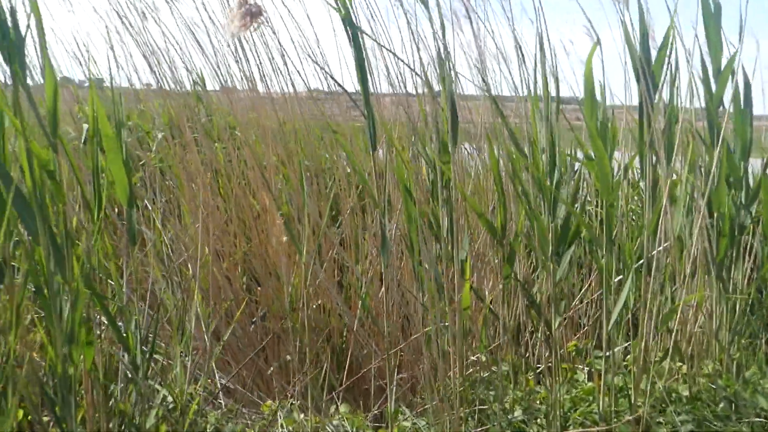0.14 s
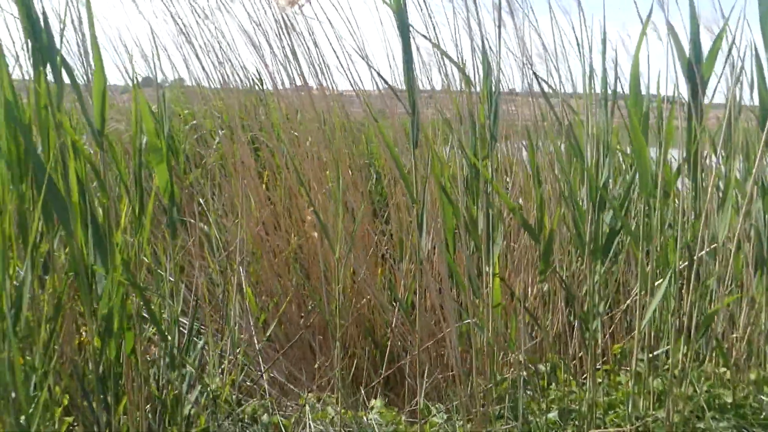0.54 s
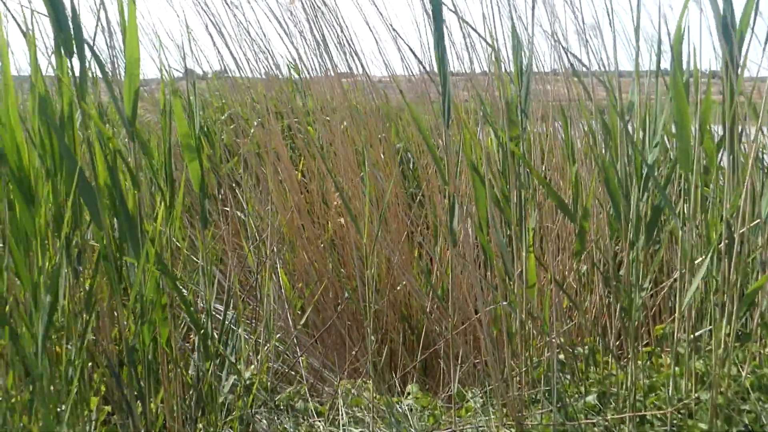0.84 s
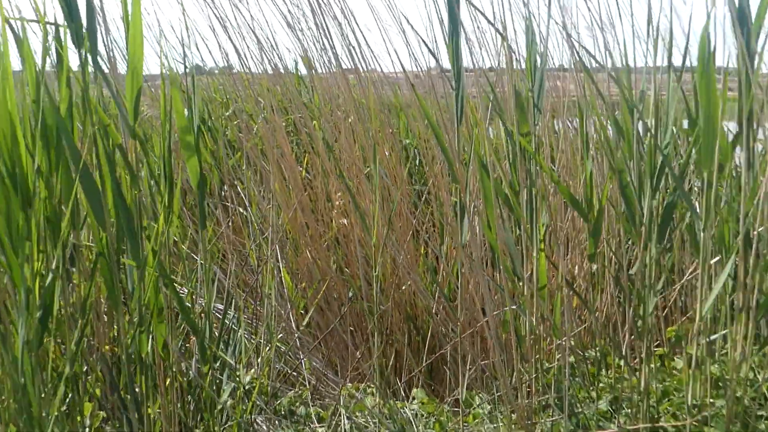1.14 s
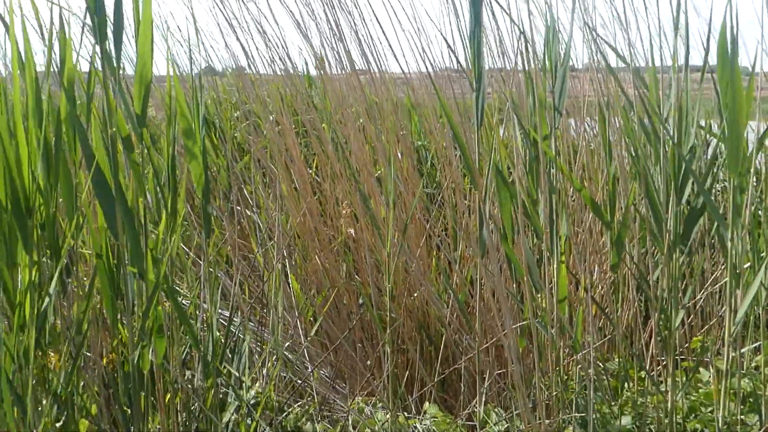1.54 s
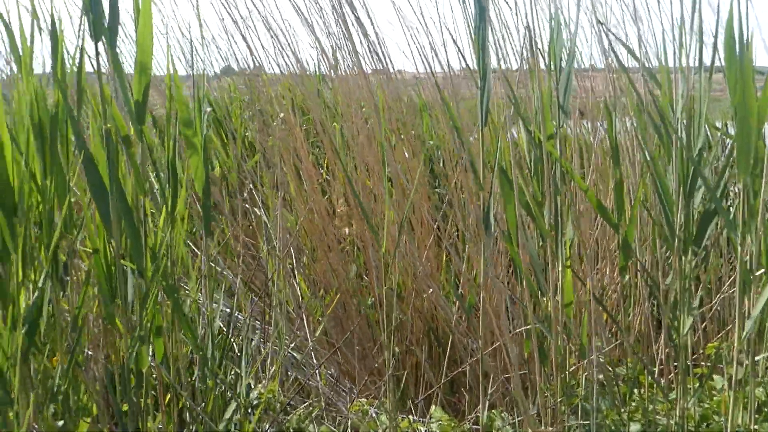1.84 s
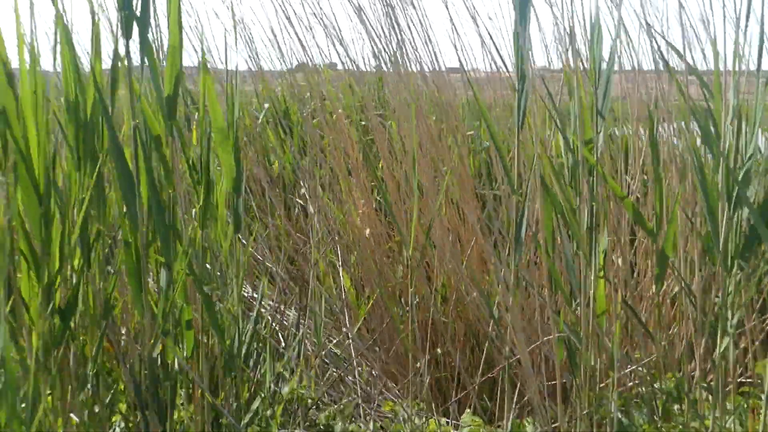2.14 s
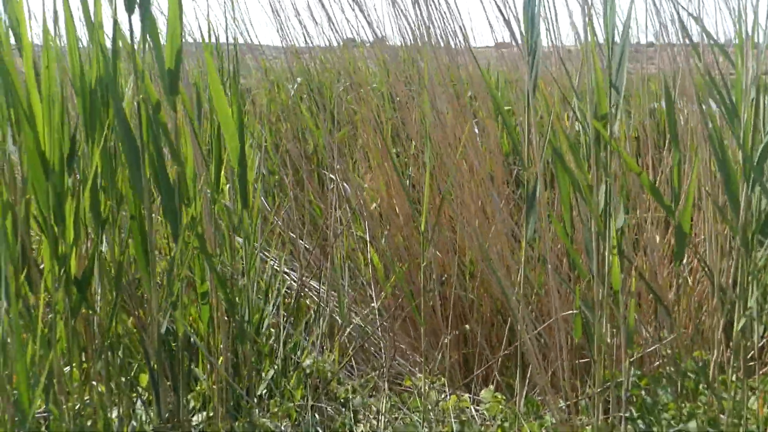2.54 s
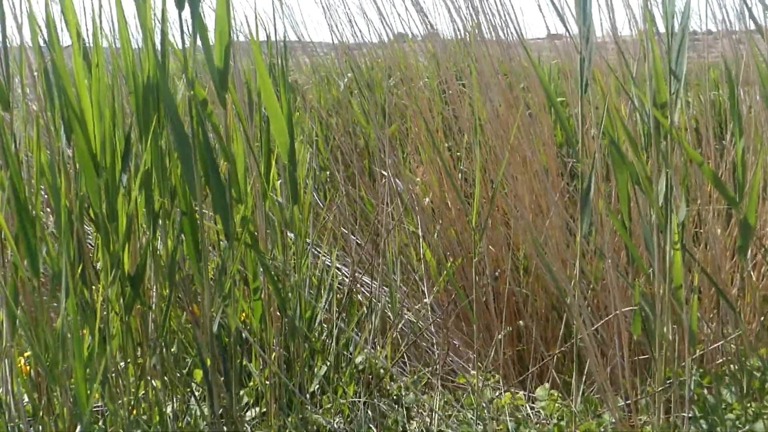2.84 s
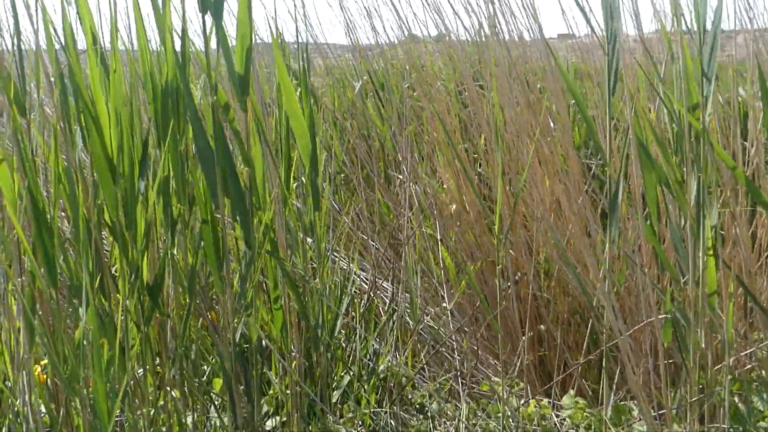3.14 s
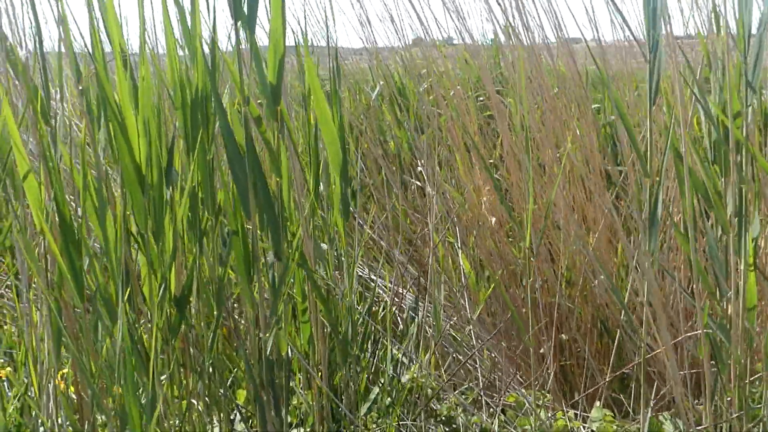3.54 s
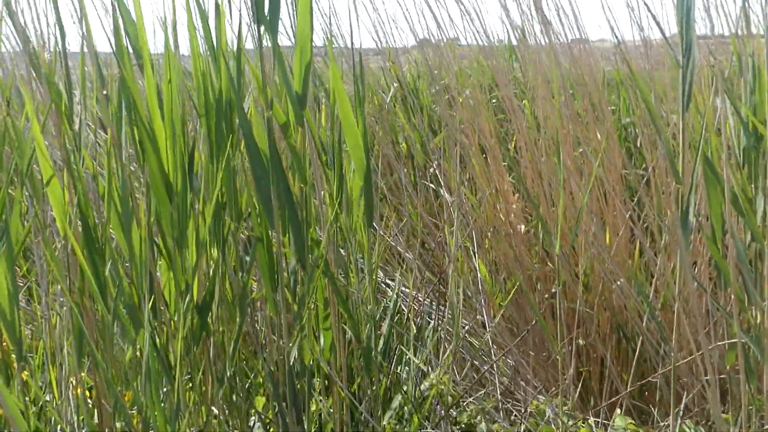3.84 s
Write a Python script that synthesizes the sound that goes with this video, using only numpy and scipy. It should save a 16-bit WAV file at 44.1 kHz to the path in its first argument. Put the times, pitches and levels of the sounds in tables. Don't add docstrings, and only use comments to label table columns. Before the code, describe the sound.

Harsh, chattering warbler song, near and slightly left, dominates the first three seconds, then a farther warbler ticks and squeaks; low wind rumble, leaf hiss, faint dove coos and a few stem clicks, outdoors.

```python
import sys
import numpy as np
from scipy import signal
from scipy.fft import rfft, irfft
from scipy.io import wavfile
from scipy.ndimage import uniform_filter1d

SR = 44100
rng = np.random.default_rng(int(sys.argv[2]) if len(sys.argv) > 2 else 0)


def attenuation_scalar(level_db):
    decades = np.asarray(level_db, float) / 20
    return 10 ** decades


def materialize(psi):
    bounded = np.clip(np.atleast_2d(psi).T, -1, 1)
    quanta = np.round(bounded * 32767).astype(np.int16)
    wavfile.write(sys.argv[1], SR, quanta)


N = 176400


def evened(x):
    return x / np.sqrt(np.mean(x ** 2) + 1e-20)


def read(points, hz):
    f, value = np.transpose(points)
    return np.interp(np.log(hz + 1), np.log(f + 1), value, left=value[0] - 30, right=-99)


def add(mix, s, sound):
    part = mix[..., max(round(s * SR), 0):][..., :sound.shape[-1]]
    part += sound[..., :part.shape[-1]]


def resonate(x, hz, width):
    b, a = signal.iirpeak(min(hz, 20000), hz / width, SR)
    return signal.lfilter(b, a, signal.lfilter(b, a, x))


def coloured(db_of_hz, channels):
    z = rfft(rng.standard_normal((channels, N)))
    return evened(irfft(z * attenuation_scalar(db_of_hz(np.fft.rfftfreq(N, 1 / SR))), N))


def drift(span_s, size):
    n = max(int(span_s * SR), 2)
    return evened(uniform_filter1d(uniform_filter1d(rng.standard_normal(size), n), n))


# frequency in Hz, level in dB per Hz.
AIR = [(400, -17.5), (900, -19.5), (3000, -24), (7000, -30.5), (11500, -29.5), (15900, -34.5)]
# middle in seconds, spread in seconds, level in dB, centre in Hz, width in octaves.
RUSTLES = [
    (1.64, 0.28, -42.5, 2670, 1),
    (2.338, 0.17, -40, 9600, 1),
    (3.97, 0.75, -47.5, 2630, 1),
    (2.87, 0.061, -41, 11300, 0.29),
]


def leaves():
    t = np.arange(N) / SR
    flicker_db, same = 1.2, 0.56
    out = attenuation_scalar(-53.5) * coloured(lambda f: read(AIR, f), 2)
    for s, spread, db, hz, octaves in RUSTLES:
        hiss = coloured(lambda f: -9 * (np.log2((f + 1) / hz) / octaves) ** 2, 2)
        swell_db = db - 8.1 * ((t - s) / spread) ** 2
        out = out + hiss * attenuation_scalar(swell_db + flicker_db * drift(0.046, size=N))
    return np.array([out[0], same * out[0] + np.sqrt(1 - same ** 2) * out[1]])


# time in seconds, level in dB.
GUST = [(0, -20.5), (.4, -30.5), (.46, -33.5), (.62, -26), (1.04, -36), (1.07, -35.5), (1.72, -38.5),
        (1.8, -28), (2.3, -29), (2.65, -44.5), (2.75, -22.5), (3.0, -36), (3.15, -40), (3.5, -29),
        (4, -37.5)]
# start in seconds, peak in dB.
BUFFETS = [(0.026, -13.5), (0.149, -12), (0.345, -17.5), (0.385, -14.5), (0.552, -9), (0.595, -8.5),
           (0.849, -8.5), (0.969, -13.5), (1.008, -8.5), (1.776, -18.5), (1.968, -18.5), (2.047, -28.5),
           (2.163, -14.5), (2.72, -12), (2.756, -12.5), (2.83, -4), (2.926, -14), (2.994, -15.5),
           (3.464, -17.5), (3.623, -13), (3.835, -18.5), (0.256, -22), (0.301, -21.5), (.773, -34),
           (0.88, -21), (1.036, -37), (1.44, -49), (1.549, -29), (2.005, -15), (2.527, -29), (3.293, -22),
           (3.356, -30.5), (3.714, -21), (3.894, -30.5)]
# frequency in Hz, level in dB per Hz.
WIND_MID = [(30, -15), (70, -6.5), (140, 0.5), (300, -6.5), (1300, -49.5)]
# frequency in Hz, level in dB per Hz.
WIND_SIDE = [(30, -70), (100, 0.5), (300, 0.5), (600, -14), (1800, -40)]


def wind():
    t = np.arange(N) / SR
    lump_db, buffet_s, pop_s, pop_hz = 3, 0.016, 0.006, 480
    level = attenuation_scalar(np.interp(t, *np.transpose(GUST)) - 4.5 + lump_db * drift(0.018, size=N))
    mid = coloured(lambda f: read(WIND_MID, f), 1)[0]
    side = coloured(lambda f: read(WIND_SIDE, f), 1)[0]

    puffs, pops = np.zeros(N), np.zeros(N)
    u = t[:4410] / buffet_s
    shape = u * np.exp(1 - u - u ** 2 / 3)
    pop = np.exp(-((t[:900] - .009) / pop_s) ** 2)
    for s, db in BUFFETS:
        at = round((s - .003) * SR)
        local = np.sqrt(np.mean((shape * mid[at:at + 4410]) ** 2) / np.mean(shape ** 2))
        add(puffs, s - .003, attenuation_scalar(db) * shape / local)
        add(pops, s, attenuation_scalar(db - 25) * pop)

    mid = mid * (level + attenuation_scalar(-8.5) * puffs)
    side = side * (attenuation_scalar(-5) * level + attenuation_scalar(-14) * puffs)
    side = side + pops * coloured(lambda f: -12 * np.log2((f + 1) / pop_hz) ** 2, 1)[0]
    low_cut = signal.butter(3, 72, "high", fs=SR, output="sos")
    return signal.sosfilt(low_cut, [mid + side, mid - side])


# frequency in Hz, width in Hz, level in dB.
THROAT = [(2111, 610, -13), (4012, 620, -16.5), (1325, 540, -21), (5133, 780, -26), (9170, 5300, -31)]


def burst(peak_at, peak_db, beak_hz, length=.014):
    t = np.arange(1000) / SR
    pulse_hz, jitter, puff, ring_hz = 421.9, 0.3, 0.83, 527.6
    turns = np.cumsum(pulse_hz * np.exp(jitter * drift(0.0033, size=1000))) / SR + rng.random()
    pulses = evened(np.diff(np.floor(turns), prepend=0))
    drive = pulses + puff * rng.standard_normal(1000)
    drive = drive * np.sin(np.pi * np.clip(t / length, 0, 1) ** .7) ** 2

    sound = resonate(resonate(drive, beak_hz, ring_hz), beak_hz, 3 * ring_hz)
    sound = sound + 0.35 * resonate(resonate(drive, 2486, 2 * ring_hz), 3000, 880)
    for hz, width, db in THROAT:
        sound = sound + attenuation_scalar(db) * resonate(resonate(drive, hz, width), hz, 2 * width)
    return peak_at - abs(sound).argmax() / SR, attenuation_scalar(peak_db + 1) * sound / abs(sound).max()


# peak time in seconds, peak in dB, beak resonance in Hz.
RASPS = [(0.0123, -25.5, 2120), (0.0242, -30.5, 2430), (0.0321, -27, 2166), (0.041, -36.6, 2154),
         (0.0495, -38, 1900), (0.0576, -34.5, 2730), (0.4559, -33.4, 2730), (0.4633, -33, 2520),
         (0.4763, -22, 2590), (0.4868, -23.5, 2230), (0.495, -31, 2400), (0.506, -21.7, 2720),
         (0.5158, -27, 2867), (0.5272, -19, 3000), (0.5378, -22, 3200), (0.5488, -16, 2857),
         (0.5562, -24, 2297), (0.5711, -29, 2320), (0.7023, -34, 2820), (0.7108, -33, 3100),
         (0.7213, -25, 3100), (0.7308, -24, 2210), (0.7406, -30, 3230), (0.75, -24, 2600),
         (0.765, -30, 2460), (0.771, -20, 3000), (0.782, -20, 3040), (0.7899, -20, 3220),
         (0.796, -14, 3015), (0.8034, -20, 2854), (0.8116, -24, 2940), (0.8193, -25.5, 2380),
         (1.218, -27.8, 3130), (1.229, -28, 2640), (1.241, -22, 2837), (1.2531, -22.5, 3030),
         (1.2605, -21, 2460), (1.2703, -21.5, 3110), (1.2791, -17, 2870), (1.2964, -17.5, 2880),
         (1.307, -15, 2820), (1.3166, -17, 2920), (1.326, -25, 2730), (1.3367, -27, 2590),
         (1.345, -24, 2830), (1.3556, -17, 2630), (1.363, -29, 2900), (1.373, -28.5, 2660)]
# peak time in seconds, peak in dB, beak in Hz.
CHURRS = [(1.4406, -31, 1990), (1.4491, -36.8, 2550), (1.4573, -29, 3190), (1.4676, -22, 3060),
          (1.4796, -21.5, 2860), (1.4895, -18.5, 2730), (1.501, -20, 3040), (1.5096, -17.5, 2960),
          (1.5165, -15.5, 2950), (1.5274, -13.5, 2800), (1.5346, -21, 3030), (1.547, -13, 2820),
          (1.5551, -17, 2817), (1.569, -15.5, 2690), (1.576, -22, 2800), (1.5834, -27, 2540),
          (1.5905, -32, 3090), (1.602, -24.2, 2780), (1.6119, -16.5, 2675), (1.6237, -28, 2475),
          (2.1073, -32, 2910), (2.1164, -15.5, 2730), (2.1233, -20.5, 3200), (2.1339, -12.5, 3154),
          (2.1406, -16.5, 3096), (2.1507, -13, 2507), (2.276, -15.5, 2640), (2.2906, -15.5, 2700),
          (2.2952, -12.5, 3150), (2.308, -12.5, 2620), (2.4275, -27, 2605), (2.442, -16, 2890),
          (2.4586, -10, 2900), (2.6115, -20, 2690), (2.6221, -13.5, 2930), (2.6363, -10, 3000),
          (2.6455, -7.5, 3030)]


def rasps(birds_mix):
    for row in RASPS + CHURRS:
        add(birds_mix, *burst(*row))


def note(start, length, level_db, first_hz, last_hz, beak=None, throb=0.037):
    edge_s, release_s = .004, .012
    t = np.arange(0, length + (release_s if length > .05 else edge_s), 1 / SR)
    bend = 3 if last_hz > 1.15 * first_hz else 1.3
    waver = 1 + .005 * drift(0.0078, size=8820)[:len(t)]
    hz = (first_hz + (last_hz - first_hz) * (t / length) ** bend) * waver
    turn = 2 * np.pi * np.cumsum(hz) / SR

    if beak is None:
        tone = np.sin(turn)
    else:
        tone = np.zeros(len(t))
        for k in range(1, 13):
            wander_db = 3.5 * np.sqrt(max(k - 2, 0) / 4) * drift(.012, size=8820)[:len(t)]
            tone = tone + attenuation_scalar(read(beak, k * hz) + wander_db) * np.sin(k * turn + k * k)
        rough = .2 + 14 * length * np.exp(-t / .012)
        tone = tone * (1 + rough * drift(.0007, size=len(t)))

    edge = np.clip(np.minimum(t / edge_s, (t[-1] - t) / (t[-1] - length) / 2), 0, 1)
    throbbing = 1 + throb * np.sin(2 * np.pi * (78 * t + rng.random()))
    return start, attenuation_scalar(level_db) * evened(tone) * edge * throbbing


# start in seconds, length in seconds, level in dB, first pitch in Hz, last pitch in Hz.
SQUEAKS = [
    (0.121, 0.025, -42, 1258, 1750),
    (0.14, 0.087, -33, 1293, 1204),
    (0.951, .009, -37, 1480, 1770),
    (0.96, 0.058, -35.5, 1664, 1618),
    (1.773, 0.032, -32, 1480, 1990),
    (1.794, 0.1, -28, 1437, 1286),
    (2.801, 0.027, -34.5, 1380, 1245),
    (3.362, 0.091, -44.5, 1276, 1305),
    (3.7, 0.093, -40, 1202, 1151),
    (3.981, 0.028, -37.5, 1123, 1216),
]
# frequency in Hz, level in dB.
BEAK = [(1100, -22.5), (2600, -8.5), (3900, 1.5), (5100, -5), (6600, -22), (8500, -32), (11000, -16.5),
        (14500, -41)]
# frequency in Hz, level in dB.
FAR_BEAK = [(1100, -30), (3600, 0), (5200, -17), (7000, -40)]


def squeaks(birds_mix):
    for row in SQUEAKS:
        add(birds_mix, *note(*row, BEAK if row[0] < 3.2 else FAR_BEAK))


# start in seconds, length in seconds, level in dB, beak resonance in Hz.
BUZZES = [(0.155, 0.017, -40, 4650), (0.955, 0.031, -29.5, 5670), (1.792, 0.03, -24.5, 5240),
          (2.07, 0.04, -31.5, 2552), (2.207, 0.096, -32, 2550), (2.371, 0.18, -24, 2515),
          (2.52, 0.16, -27.5, 3090), (2.776, 0.18, -30.5, 4920), (3.306, .07, -36.5, 3370),
          (3.559, 0.11, -38, 3460), (3.829, 0.11, -35.5, 3560), (3.064, 0.19, -36, 2052)]


def buzzes(birds_mix):
    gap_s, burst_s, spread_db = .0075, .011, 2
    for s, length, db, hz in BUZZES:
        for k in range(28):
            into = (k + .5) * gap_s / length
            peak_at = s + (k + rng.random()) * gap_s
            peak_db = db + spread_db * rng.standard_normal()
            start, sound = burst(peak_at, peak_db, hz * rng.uniform(.93, 1.07), burst_s)
            add(birds_mix, start, sound * np.sin(np.pi * min(into, 1)) ** .5)


# start in seconds, length in seconds, level in dB, first Hz, last Hz.
WHISTLES = [(.24, 0.14, -47, 460, 503), (.48, 0.093, -44, 539, 459), (0.645, 0.11, -40.5, 451, 453),
            (1.425, .012, -44, 3000, 3260), (2.024, .018, -45, 3150, 2520), (2.985, .018, -57, 7000, 4770),
            (3.05, .025, -60, 7300, 6100), (1.18, 0.025, -48, 3000, 3450), (3.43, 0.05, -53, 2050, 1900),
            (3.755, .018, -53, 7400, 5500), (3.813, 0.03, -57, 7500, 6100), (3.885, 0.035, -40, 3105, 3070)]


def far_whistles(birds_mix):
    for row in WHISTLES:
        add(birds_mix, *note(*row))


# peak time in seconds, peak in dB, beak resonance in Hz.
FAR_TICKS = [
    (0.411, -43, 2730),
    (0.422, -43, 2750),
    (1.947, -38, 2560),
    (1.969, -42.5, 2600),
    (3.364, -29, 3040),
    (3.383, -28, 2020),
    (3.522, -37, 3170),
    (3.634, -26.5, 3010),
    (3.803, -37.5, 3540),
    (3.886, -28.5, 3500),
]


def far_ticks(birds_mix):
    for row in FAR_TICKS:
        add(birds_mix, *burst(*row))


# start in seconds, peak in dB, resonance in Hz, width in Hz.
SNAPS = [
    (1.219, -19.5, 10000, 2500),
    (2.716, -27.5, 1290, 503),
    (3.442, -31, 780, 487),
]


def snaps(birds_mix):
    t = np.arange(400) / SR
    for s, db, hz, width in SNAPS:
        click = rng.standard_normal(400) * np.sqrt(t) * np.exp(-t / 0.00093)
        tick = resonate(resonate(click, hz, 3 * width), hz, 3 * width)
        add(birds_mix, s, attenuation_scalar(db) * tick / abs(tick).max())


# start in seconds, level in dB.
CHACKS = [
    (2.141, -23),
    (2.302, -22),
    (2.463, -23),
    (2.646, -22.5),
]
# first pitch in Hz, last pitch in Hz.
CHACK_HZ = (1353, 1187)
# frequency in Hz, level in dB.
CHACK_BEAK = [(1100, -36), (2500, 0), (3900, -32)]


def chacks(birds_mix):
    for s, db in CHACKS:
        add(birds_mix, *note(s, 0.0395, db, *CHACK_HZ, CHACK_BEAK, .4))


# start in seconds, level in dB.
TRILL = [
    (2.822, -30.5),
    (2.856, -26.5),
    (2.891, -26),
]
# length in seconds, first pitch in Hz, last pitch in Hz.
FLICK = (.014, 1570, 1710)
# length in seconds, first pitch in Hz, last pitch in Hz.
HELD = (.026, 1330, 1355)


def trill(birds_mix):
    for s, db in TRILL:
        add(birds_mix, *note(s, FLICK[0], db - 2, *FLICK[1:], FAR_BEAK))
        add(birds_mix, *note(s + .012, HELD[0], db, *HELD[1:], BEAK))


def among_stems(dry_birds):
    t = np.arange(SR // 3) / SR
    echo_t60, echo_wide, pan_db = 0.2, .65, .4
    taps = rng.standard_normal((2, len(t))) * attenuation_scalar(-60 * t / echo_t60) * (t > .002)
    taps = taps[0] + echo_wide * np.array([taps[1], -taps[1]])
    echoes = signal.fftconvolve(dry_birds[None], taps / np.linalg.norm(taps[0]), axes=1)[:, :N]
    return dry_birds * attenuation_scalar(np.array([[pan_db], [-pan_db]])) + attenuation_scalar(-10) * echoes


def scene():
    birds_mix = np.zeros(N)
    for source in (rasps, squeaks, buzzes, far_whistles, far_ticks, snaps, chacks, trill):
        source(birds_mix)
    return leaves() + wind() + among_stems(birds_mix)


def band_limit(x):
    return signal.sosfilt(signal.butter(12, 15810, fs=SR, output="sos"), x)


def record(dry):
    dip = .7
    b, a = signal.iirnotch(7730, 14, SR)
    dipped = (1 - dip) * dry + dip * signal.lfilter(b, a, dry)
    band = signal.firwin(511, 15750, window=("kaiser", 10), fs=SR)
    limited = signal.oaconvolve(dipped, band[None], "same")
    return band_limit(limited)


dry = scene()
out = record(dry)
materialize(out)
```